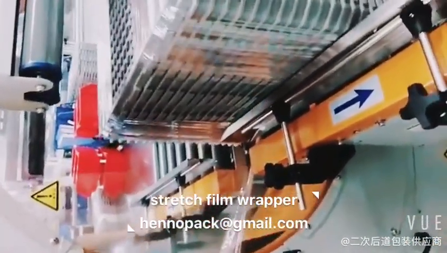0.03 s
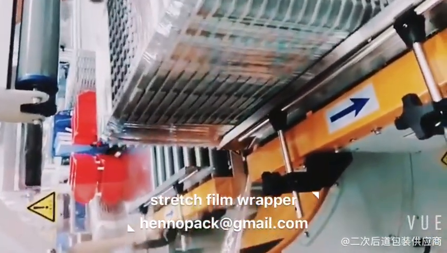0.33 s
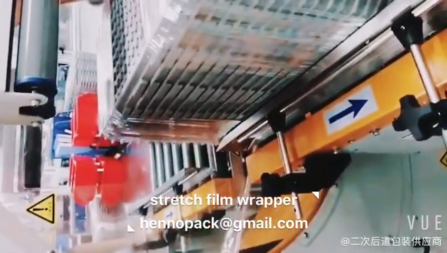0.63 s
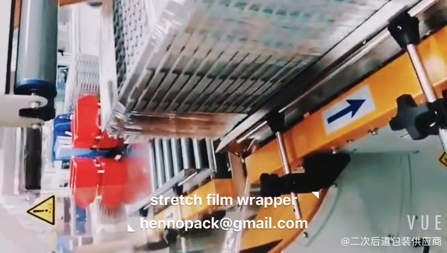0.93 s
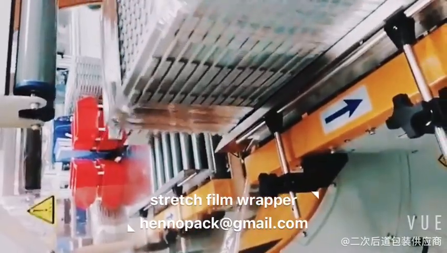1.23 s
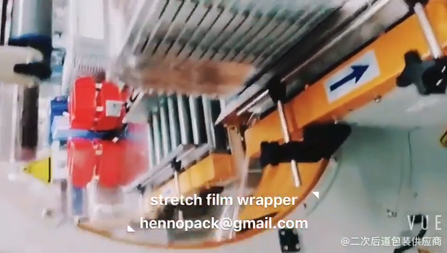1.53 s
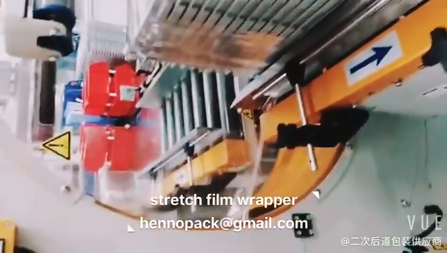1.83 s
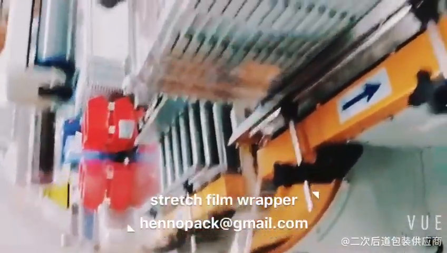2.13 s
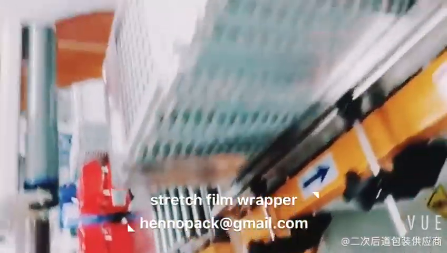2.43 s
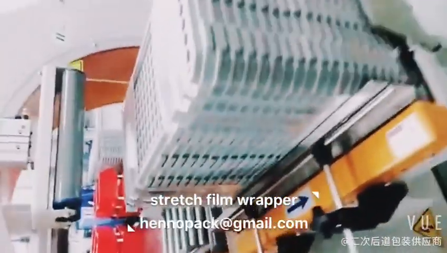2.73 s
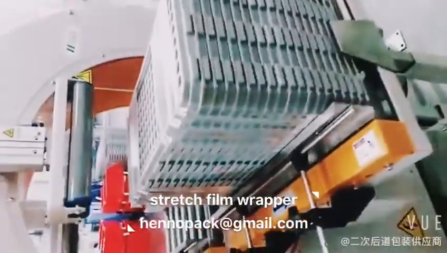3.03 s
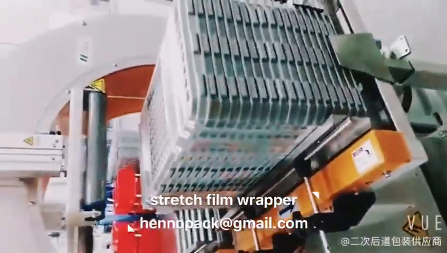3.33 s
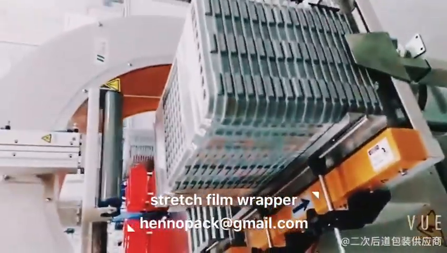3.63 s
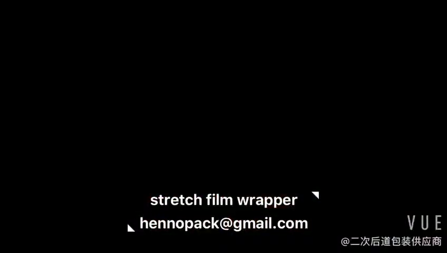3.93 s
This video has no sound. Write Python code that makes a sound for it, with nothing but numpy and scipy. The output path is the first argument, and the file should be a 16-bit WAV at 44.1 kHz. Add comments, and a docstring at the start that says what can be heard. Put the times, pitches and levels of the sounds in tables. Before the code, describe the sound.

A wrapping machine roars loudly in a factory hall, with air and peeling plastic film hissing and crackling. At about 1.7 seconds it stops, leaving a quiet motor hum. A metal clamp clacks on the left at 2.2 seconds, then light bumps follow. At 3.2 a valve puffs air through ringing steel. Conveyor rollers rumble softly from 3.6, and the load lands a hollow clunk near 3.9 seconds.

```python
"""A ring wrapping machine, heard from a stereo microphone in a hard-walled factory hall: air and peeling
stretch film hiss over the roar of the running machine, then both cut off and die away in the hall.
A motor hum remains. A metal clamp clacks left of the microphone, a valve vents through ringing
steelwork, and the load bumps along the roller conveyor, ending in a hollow clunk."""
import sys
import numpy as np
from scipy import signal
from scipy.fft import rfft, irfft, next_fast_len
from scipy.io import wavfile
from scipy.ndimage import uniform_filter1d, map_coordinates

SR = 44100
rng = np.random.default_rng(int(sys.argv[2]) if len(sys.argv) > 2 else 0)


def output_pcm(signal):
    """Save a mono or channel-first signal as 16-bit PCM at the path in sys.argv[1].

    Samples are clipped to [-1, 1] before scaling.
    """
    pcm = np.clip(np.atleast_2d(signal).T, -1, 1) * 32767
    wavfile.write(sys.argv[1], SR, np.round(pcm).astype(np.int16))


N = 176400

STOP_S, VENT_S = 1.715, 3.185  # the machine stops; the valve opens
TOP_HZ = 7660  # upper edge of the microphone's band
# spectrum of the air and film hiss (frequency [Hz], relative level [dB])
HISS_SPECTRUM = [(400, -41.5), (1000, -2), (1400, -0.5), (1650, -1), (1950, 3), (2300, 0), (2620, 2),
                 (2850, -0.5), (3250, -2), (3800, -0.6), (4800, 0.5), (5200, -1.5), (6300, 0.5),
                 (7500, -2.5)]
# balance of diffuse sound at the microphone (frequency [Hz], left over right [dB])
BALANCE = [(180, -1), (310, 2), (900, -0.5), (1600, 3.5), (2600, 5), (4700, 0.5), (7500, 2.5)]


def amp(db):
    """Decibels to gain."""
    return 10 ** (np.asarray(db) / 20)


def unit(x):
    """Scale to rms 1."""
    return x / np.sqrt(np.mean(x ** 2) + 1e-20)


def along(points, hz):
    """Read (frequency [Hz], value) points along a log frequency axis."""
    freqs, values = np.transpose(points)
    return np.interp(np.log(hz + 1), np.log(freqs + 1), values)


def clock():
    """Time of each sample in seconds."""
    return np.arange(N) / SR


def curve(rows):
    """Join (time [s], value) points by straight lines."""
    return np.interp(clock(), *np.transpose(rows))


def wobble(per_s):
    """A smooth random curve with per_s knots a second."""
    return map_coordinates(rng.standard_normal(2048), [clock() * per_s], mode="mirror")


def burst(start, attack_s, t60):
    """A quick rise at start and an exponential fade."""
    age = np.maximum(clock() - start, 0)
    return (1 - np.exp(-age / attack_s)) * np.exp(-np.log(1000) * age / t60)


def swells(rows):
    """Bell-shaped rises from (time [s], level [dB], half length [s]) rows."""
    return sum(amp(db) * np.exp(-.5 * ((clock() - s) / half) ** 2) for s, db, half in rows)


def filtered(x, response):
    """Pass x through a complex response given as a function of frequency."""
    size = next_fast_len(N + SR // 2)
    return irfft(rfft(x, size) * response(np.fft.rfftfreq(size, 1 / SR)), size)[..., :N]


def resonate(x, modes):
    """Ring a body's (frequency [Hz], width [Hz], gain [dB]) modes, keeping the power of white noise."""
    def body(f):
        response = sum((-1) ** k * amp(db) * 1j * f * width / (hz * hz - f * f + 1j * f * width)
                       for k, (hz, width, db) in enumerate(modes))
        return response / np.sqrt(np.mean(abs(response) ** 2))
    return filtered(x, body)


def pan(x, left_db):
    """Place a source to the left of the microphone."""
    return x * amp(np.array([[left_db], [-left_db]]) / 2)


def noise(spectrum, patchy_db):
    """Diffuse stereo noise of rms 1 with shifting hollows in its spectrum."""
    # how alike the two channels are (frequency [Hz], correlation [ratio])
    likeness = [(60, 1), (130, 1), (240, 1), (490, 0.57), (900, 0.39), (1600, .02), (7000, 0.24)]
    def mid_and_side(hz):
        angle = np.arccos(np.clip(along(likeness, hz), -1, 1)) / 2
        return amp(along(spectrum, hz)) * [np.cos(angle), np.sin(angle)] * (hz < TOP_HZ)
    cells = signal.stft(rng.standard_normal((2, N)), nperseg=512)[2]
    patches = uniform_filter1d(rng.standard_normal(cells.shape[1:]), size=5, axis=0)
    patches = unit(uniform_filter1d(patches, size=12, axis=1))
    pair = signal.istft(cells * amp(patchy_db * np.minimum(patches, .5)), nperseg=512)[1][:, :N]
    mid, side = filtered(pair, mid_and_side)
    stereo = np.array([mid + side, mid - side])
    return unit(filtered(stereo, lambda hz: amp(np.outer([.5, -.5], along(BALANCE, hz)))))


def panels(x, share, longest_s, drift_s, count=6):
    """Close reflections off the machine's panels comb the sound; each channel's paths drift apart."""
    t = clock()
    def drift():
        return drift_s * np.interp(t, np.arange(16) / 3, rng.standard_normal(16))
    def comb(channel):
        delays = [rng.uniform(0.002021, longest_s) + drift() for _ in range(count)]
        reflections = sum(np.interp(t - delay, t, channel, left=0) for delay in delays)
        return channel + share / np.sqrt(count) * reflections
    return unit(np.array([comb(channel) for channel in x]))


def hall(x, wet_db):
    """The tail alone that the hard walls send back; each frequency dies at its own speed."""
    # reverberation of the hall (frequency [Hz], t60 [s])
    decay_times = [(150, 0.49), (1000, 0.38), (4000, 0.66), (8000, 0.94)]
    hz, t, cells = signal.stft(rng.standard_normal((2, SR)), SR, nperseg=256)
    decay = np.exp(-np.log(1000) * t / along(decay_times, hz)[:, None])
    tail = signal.istft(cells * decay, SR, nperseg=256)[1]
    return amp(wet_db) * signal.fftconvolve(x[None], tail / np.linalg.norm(tail[0]), axes=1)[:, :N]


def cut_off(drop_db, fall_db_per_s):
    """At the stop the direct sound drops out and the hall's share dies away."""
    since = np.maximum(clock() - STOP_S, 0)
    return amp(-drop_db * (1 - np.exp(-since / 0.02)) - fall_db_per_s * since)


def motor_tones(drift_hz, waver_db):
    """Turning parts hum at slightly unsteady pitches."""
    # tones of the motors (frequency [Hz], level [dB])
    lines = [(98.5, -55), (145.3, -60.5), (237, -62.5), (387.6, -78), (436, -68), (861, -70), (1110, -73.5)]
    hum = 0
    for hz, db in lines:
        rms = amp(db + waver_db * wobble(8.3))
        phase = 2 * np.pi * np.cumsum(hz + drift_hz * wobble(14)) / SR
        hum += np.sqrt(2) * rms * np.sin(phase)
    return hum


def idling():
    """The room tone: motors and ventilation that keep going throughout."""
    # loudness of the ventilation (time [s], level [dB])
    levels = [(0, -42), (2.0, -44), (2.35, -43), (2.7, -46.5), (2.9, -45), (3.05, -44.5), (3.58, -43.5),
              (3.8, -43), (4, -45)]
    # its spectrum (frequency [Hz], relative level [dB])
    spectrum = [(25, -23), (48, -1.5), (70, -8.5), (98, 2.5), (170, -6), (240, -1.5), (370, -8),
                (480, -6.5), (620, -13), (800, -4.5), (890, -4), (1000, -15.5), (1700, -17.5), (2400, -23),
                (3000, -31), (5000, -36.5), (7500, -33.5)]
    air = panels(noise(spectrum, patchy_db=3), share=.4, longest_s=.015, drift_s=.0003)
    return amp(curve(levels) + 0.83 * wobble(15)) * air + motor_tones(drift_hz=2.76, waver_db=1.5)


def scrapes():
    """The load rubs softly along its guide."""
    # swells of rubbing (time [s], level [dB], half length [s])
    rubs = [(2.923, -52.5, 0.037), (3.08, -67, 0.047), (3.833, -62, 0.024)]
    # their spectrum (frequency [Hz], relative level [dB])
    spectrum = [(500, -19), (900, -5), (1300, 6), (1800, -1), (2600, 1), (3200, -21), (7500, -34)]
    return swells(rubs) * noise(spectrum, patchy_db=0.5)


def rollers():
    """The rollers rumble as the load starts to travel."""
    # loudness of the rollers under the load (time [s], level [dB])
    levels = [(3.6, -73), (3.66, -50), (3.72, -61), (3.8, -47), (4, -47.5)]
    # their spectrum (frequency [Hz], relative level [dB])
    spectrum = [(70, -20), (140, 2.5), (340, 1.5), (500, -6), (750, -9), (1100, -22), (3000, -50)]
    return amp(curve(levels)) * noise(spectrum, patchy_db=0.0)


def conveyor():
    """Hollow bumps of the load and knocks on the frame, almost straight ahead, with the hall behind."""
    # the load bumps over the rollers (time [s], level [dB], pitch [Hz], t60 [s])
    load_hits = [(2.557, -29, 113, 0.092), (3.085, -35.5, 206, 0.23), (3.642, -38, 216.3, 0.26),
                 (3.75, -40.5, 282, 0.36), (3.93, -28.5, 241, 0.15), (3.954, -26.5, 236, 0.32)]
    # knocks on the conveyor frame (time [s], level [dB])
    frame_hits = [(2.165, -40), (2.756, -43.5), (2.871, -44), (3.364, -44), (3.909, -30.5), (3.921, -43),
                  (3.976, -36)]
    # resonances of the frame (frequency [Hz], width [Hz], gain [dB])
    frame_modes = [(326, 41, -5), (730, 110, -9.5), (920, 89, -12.5), (1494, 60, -12), (1940, 150, -21.5),
                   (2330, 51, -24)]
    bumps = sum(amp(db) * burst(s, 0.0036, t60) * np.sin(2 * np.pi * hz * (clock() - s))
                for s, db, hz, t60 in load_hits)
    force = sum(amp(db) * burst(s, attack_s=.002, t60=0.071) for s, db in frame_hits)
    knocks = resonate(force * rng.standard_normal(N), frame_modes)
    return pan(bumps + knocks, left_db=1.0) + hall(knocks, wet_db=2.5) + hall(bumps, wet_db=-13.5)


def valve():
    """Air puffs from the outlet as the pressure bleeds off, rattling steelwork a little to the left."""
    # ringing parts of the steelwork (frequency [Hz], width [Hz], level [dB], t60 [s])
    steel_modes = [(787, 38, -50, 2.5), (897, 52, -49.5, 1.2), (1111, 35, -48, 1.6), (1287, 39, -56, 1.4),
                   (1656, 91, -49.5, 2.1), (1790, 35, -50.5, 1.6), (2390, 97, -46.5, 1.67),
                   (2510, 70, -52.5, 1), (3680, 150, -62.5, 1.4), (4550, 80, -58, .5),
                   (5760, 47, -56, 0.97), (7360, 33, -61.5, 1.6)]
    # bare air at the outlet (frequency [Hz], relative level [dB])
    puff_spectrum = [(1500, -19), (2600, 3), (3200, -6), (4500, 1), (7500, 2)]
    # softening of the steel's treble (frequency [Hz], gain [dB])
    treble = [(2700, -1.5), (3150, -10), (3700, -2.5), (5500, -2)]
    def rattle(hz, width, db, t60):
        chatter_db = 2.5 * wobble(45)
        flow = amp(db + chatter_db) * burst(VENT_S, attack_s=.001, t60=t60)
        return resonate(flow * rng.standard_normal((2, N)), [(hz, width, 0)])
    steel = filtered(sum(rattle(*mode) for mode in steel_modes), lambda hz: amp(along(treble, hz)))
    puff = amp(-59) * burst(VENT_S, attack_s=.005, t60=2) * noise(puff_spectrum, patchy_db=3.5)
    flutter = amp(1.5 * wobble(70))
    return pan(steel, left_db=3.5) + puff * flutter


def clamp():
    """A quick run of padded contacts rings the metal clamp, well to the left; the hall answers."""
    # contacts of the clamp (time [s], level [dB])
    contacts = [(2.188, -33.5), (2.196, -34), (2.203, -23), (2.213, -29), (2.231, -35.5)]
    # its resonances (frequency [Hz], width [Hz], gain [dB])
    modes = [(880, 29, -11), (1166, 77, 0.5), (1555, 44, -11), (1860, 140, 1), (2200, 99, -1.5),
             (2380, 66, -5.5), (2600, 144, -4), (2900, 110, -11), (3880, 100, -11), (4020, 60, -9),
             (5270, 220, -19), (6950, 570, -20.5)]
    force = sum(amp(db) * burst(s, attack_s=0.0019, t60=0.03) for s, db in contacts)
    ringing = resonate(force * rng.standard_normal(N), modes)
    direct = filtered(ringing, lambda hz: amp(along([(4200, -2), (5200, -13)], hz)))
    return pan(direct, left_db=15) + pan(hall(ringing, wet_db=0.0), left_db=3)


def running():
    """The frame rumbles, the ring churns and the drive whines amid a roar and rush; all stop together."""
    # loudness of the deep rumble, low roar and midrange rush (time [s], level [dB])
    rumble_levels = [(0, -54), (.3, -41), (.8, -42), (1.4, -42.5), (1.6, -45), (1.69, -53)]
    roar_levels = [(0, -32), (.15, -30.5), (.3, -33.5), (.5, -30.5), (.6, -33.5), (.75, -34), (.9, -30.5),
                   (1.05, -30.5), (1.3, -31), (1.44, -29.5), (1.53, -26), (1.62, -33), (1.69, -32)]
    rush_levels = [(0, -27.5), (.14, -28), (.27, -30), (.41, -27), (.6, -32), (.9, -32.5), (1.05, -32),
                   (1.45, -33), (1.69, -34.5)]
    # their spectra (frequency [Hz], relative level [dB])
    rumble_spectrum = [(25, -26.5), (48, -7), (75, -5.5), (100, 0), (135, -2), (200, -19), (400, -32.5)]
    roar_spectrum = [(40, -35), (120, -25.5), (155, -2), (180, -4.5), (255, -3.5), (300, 0), (365, 2),
                     (430, -4), (600, -7.5), (1200, -44)]
    rush_spectrum = [(250, -39), (450, -1), (570, -0.5), (660, 4.5), (780, 3.5), (850, 0.5), (950, 0.5),
                     (1100, -3), (1500, -8), (2500, -15.5)]
    # the ring drones louder as it turns (time [s], level [dB], half length [s])
    churns = [(.79, -33, 0.036), (1.04, -32, 0.025), (1.26, -34.5, 0.022), (1.45, -31, 0.026),
              (1.66, -34, 0.028)]
    # resonances of the ring and the drive (frequency [Hz], width [Hz], gain [dB])
    ring_modes = [(179, 31, 0), (246.5, 24, 2)]
    drive_modes = [(354, 22, 0), (633.5, 21, -4.5), (770, 17, 1.5)]
    rumble = amp(curve(rumble_levels)) * noise(rumble_spectrum, patchy_db=1.6)
    churn = swells(churns) * resonate(rng.standard_normal(N), ring_modes)
    roar = amp(curve(roar_levels) + 0.3 * wobble(25)) * noise(roar_spectrum, patchy_db=1.44)
    rush = amp(curve(rush_levels) + .8 * wobble(35)) * noise(rush_spectrum, patchy_db=1.8)
    whine = amp(-37) * resonate(rng.standard_normal(N), drive_modes)
    deep = (rumble + churn + roar) * cut_off(drop_db=7.0, fall_db_per_s=58.5)
    return deep + (rush + whine) * cut_off(drop_db=3.0, fall_db_per_s=56.5)


def crackle(snaps_per_s=380, spread_db=8, decay_s=0.00069):
    """Stretch film peels off its roll in tiny snaps, in the colour of the hiss."""
    def colour(hz):
        balance_db = np.outer([.5, -.5], along(BALANCE, hz))
        return amp(along(HISS_SPECTRUM, hz) + balance_db) * (hz < TOP_HZ)
    chance, size = rng.random(N), rng.exponential(1, N)
    snaps = (chance < snaps_per_s / SR) * amp(spread_db * np.minimum(size, 3))
    envelope = signal.lfilter([1], [1, -np.exp(-1 / (decay_s * SR))], snaps)
    return unit(filtered(envelope * rng.standard_normal((2, N)), colour))


def film():
    """Air and peeling film hiss, crackle in clumps and rasp at each tug until the machine stops."""
    # loudness of the hiss (time [s], level [dB])
    levels = [(0, -30), (.06, -30.5), (.28, -30), (.39, -29.5), (.5, -28.5), (.62, -29.5), (1.0, -31.5),
              (1.25, -30.5), (1.45, -31.5), (1.62, -29.5), (1.69, -32.5)]
    # the film tightens and rasps louder (time [s], level [dB], half length [s])
    tugs = [(.376, -27, 0.015), (.49, -35, .012), (.66, -38, .009), (1.158, -23.5, .014), (1.6, -32, 0.018)]
    # a near panel mirrors the hiss to the microphone's right (time [s], delay [s], share [ratio])
    reflection = [(0, 0.0056, 0.18), (1.25, 0.0058, 0.19), (1.5, .00485, 0.41), (1.7, 0.0047, .3)]
    air = panels(noise(HISS_SPECTRUM, patchy_db=4.2), share=.67, longest_s=.012, drift_s=.00015)
    clumps = amp(3.5 * wobble(14))
    snaps = unit(np.tanh(clumps * crackle() / 5))  # the sharpest peaks are rounded off
    hiss = amp(curve(levels) + 0.95 * wobble(25)) * (air + amp(-8.5) * snaps)
    rasp = swells(tugs) * np.tanh(crackle())
    left, right = hiss + rasp
    t = clock()
    times, delays, shares = np.transpose(reflection)
    delayed = np.interp(t - np.interp(t, times, delays), t, right, left=0)
    echo = np.interp(t, times, shares) * delayed
    return np.array([left, right + echo]) * cut_off(drop_db=2.3, fall_db_per_s=98)


def scene():
    """All parts of the machine as they reach the microphone."""
    return running() + film() + rollers() + idling() + clamp() + valve() + scrapes() + conveyor()


def record(dry):
    """The microphone's band ends steeply at TOP_HZ."""
    return filtered(dry, lambda hz: 1 / np.sqrt(1 + np.minimum(hz / TOP_HZ, 2) ** 400))


dry = scene()
out = record(dry)
output_pcm(out)
```